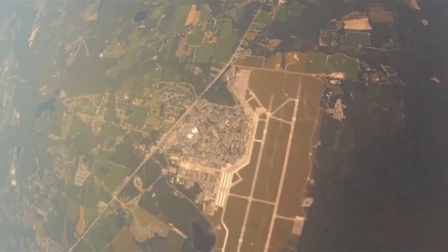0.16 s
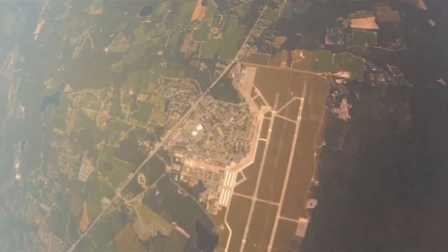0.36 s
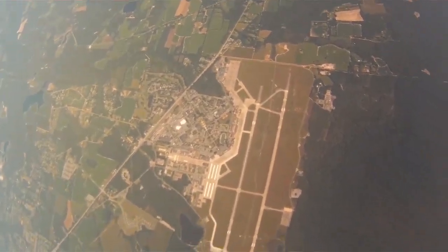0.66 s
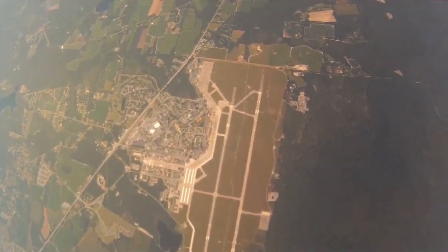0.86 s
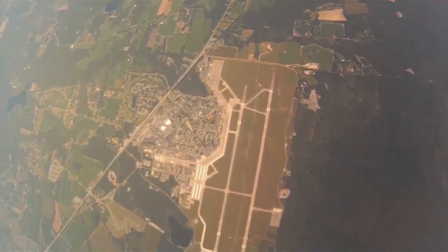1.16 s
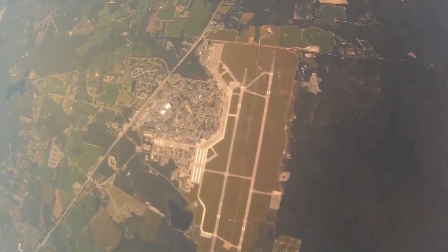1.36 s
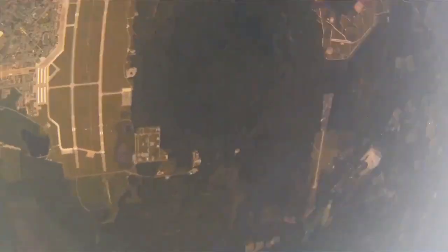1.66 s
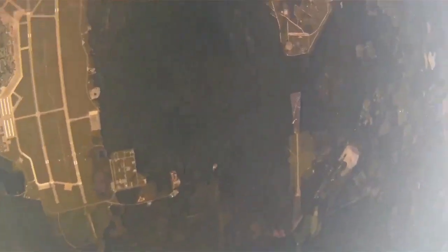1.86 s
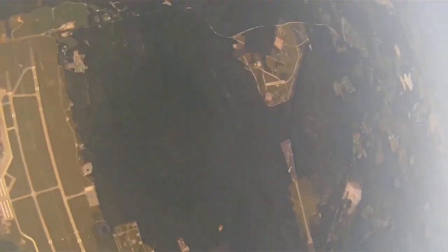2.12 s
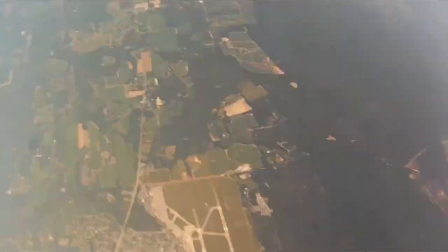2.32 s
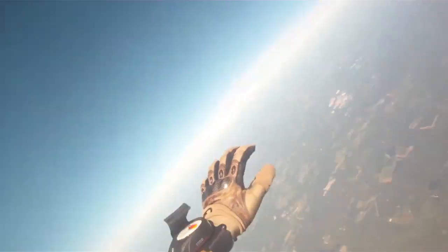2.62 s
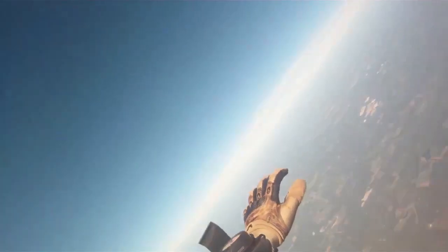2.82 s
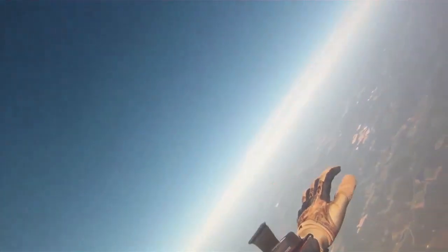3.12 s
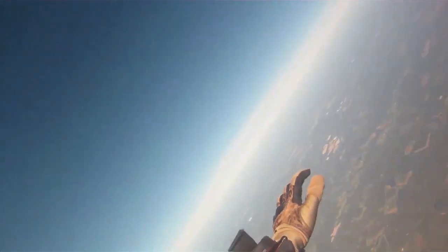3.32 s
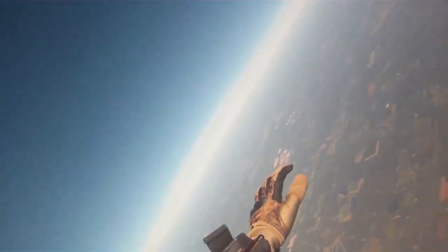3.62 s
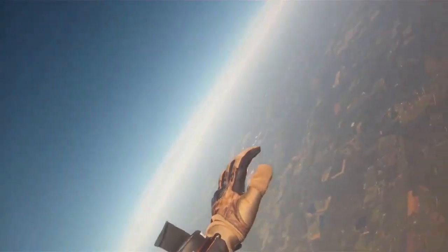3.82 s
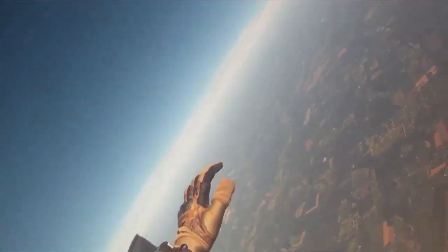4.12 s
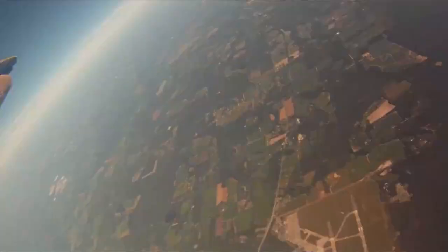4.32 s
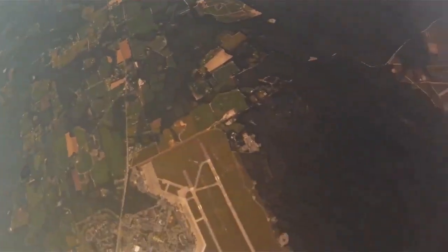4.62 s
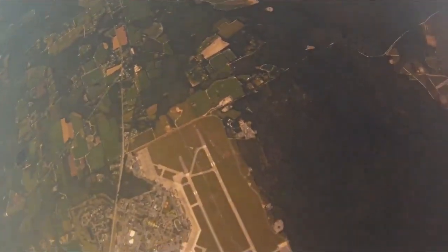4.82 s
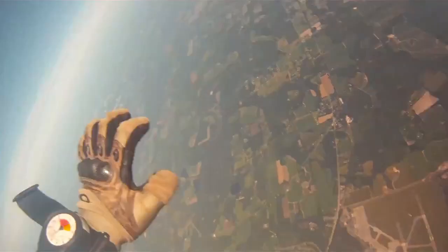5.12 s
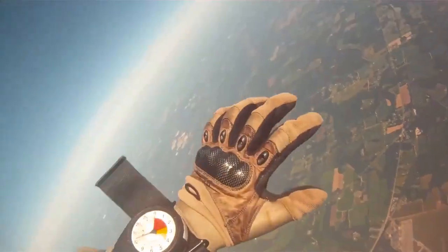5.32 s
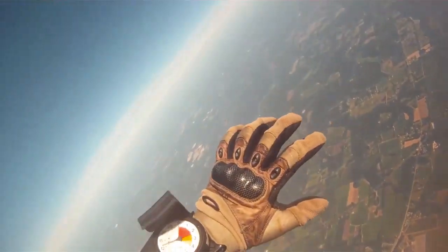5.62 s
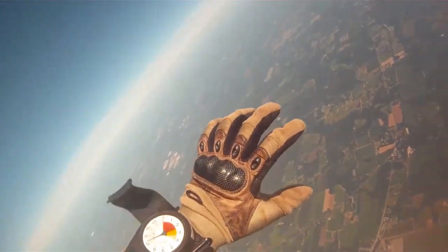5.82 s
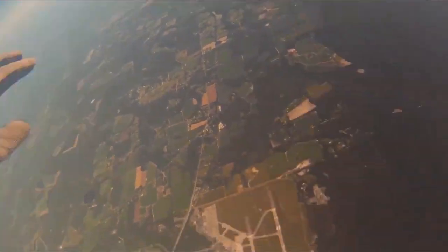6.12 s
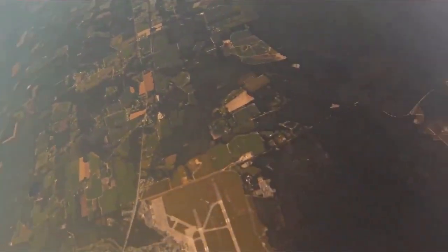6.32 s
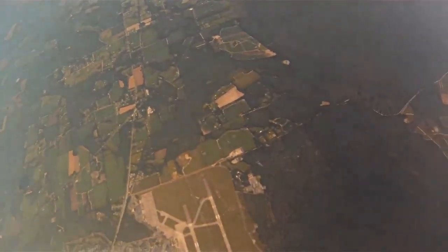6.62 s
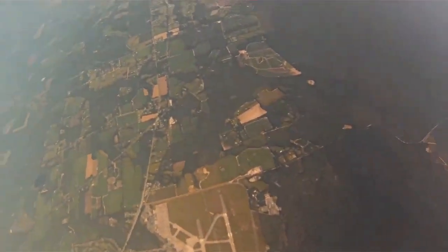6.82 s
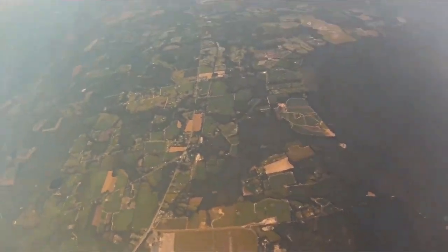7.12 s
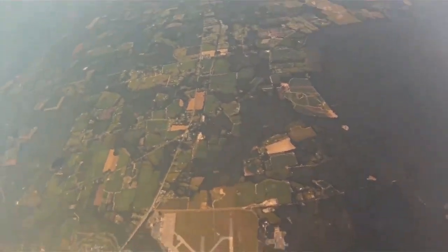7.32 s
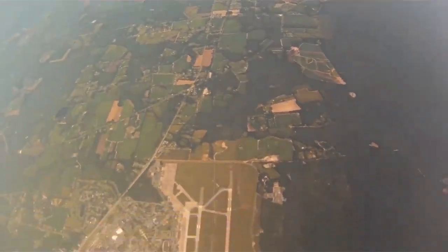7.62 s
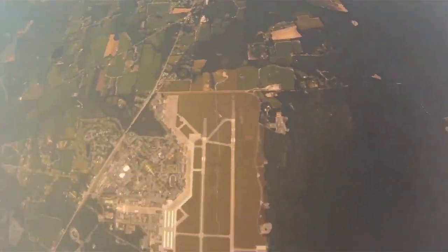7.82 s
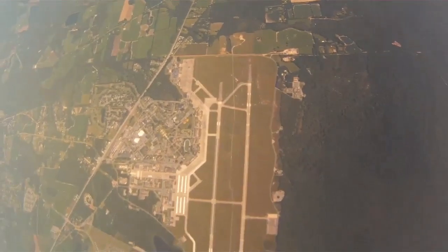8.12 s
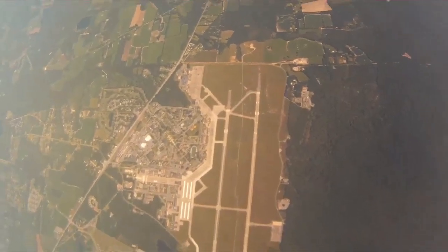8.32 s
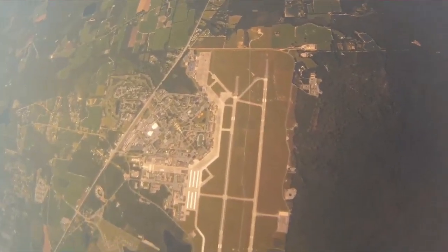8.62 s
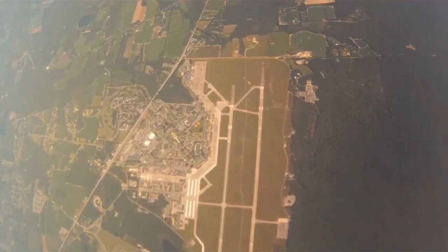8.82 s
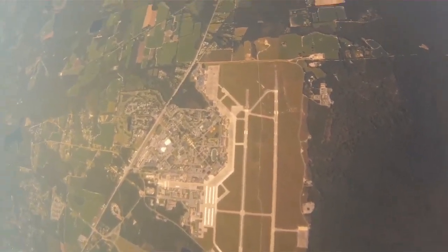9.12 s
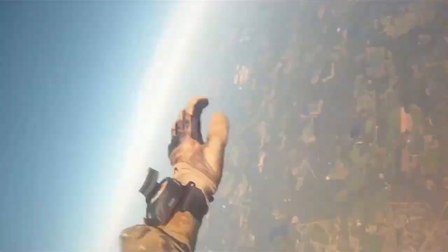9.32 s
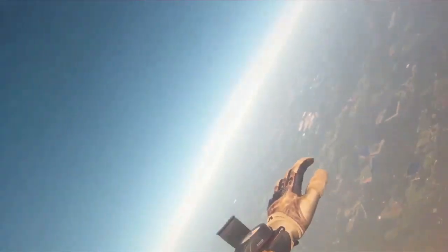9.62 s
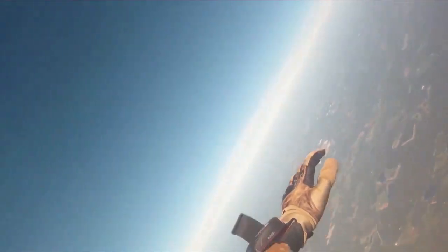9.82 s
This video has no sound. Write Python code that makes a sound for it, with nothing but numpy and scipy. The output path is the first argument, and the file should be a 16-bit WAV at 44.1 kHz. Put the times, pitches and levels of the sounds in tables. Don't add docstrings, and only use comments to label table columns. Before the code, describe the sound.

Dense, steady freefall wind fills all ten seconds, close and dry in mono, as if pressing on a small plastic camera case. From 0 to 2.3 s it is a bright, hissy, slightly hollow rush with light low flutter and a very faint whistle. Around 2.4 s it abruptly turns fuller and rougher: low buffeting swells, a blurred moan near 65 Hz appears and the midrange rings nasally around 730 Hz. At 4.4 s it snaps back to the thinner hiss, then at 5.2 s the heavy roar returns. From 6.2 s it is intermediate, with wavering low moan; at 7.1 s it deepens again. From 7.9 to 9.2 s the lean, airy rush returns, before a quick jump at 9.3 s to the heavy, fluttering roar, which continues to the cut. Small gusts roughen it throughout; the treble is gritty and limited.

```python
import sys
import numpy as np
from scipy import signal
from scipy.fft import rfft, irfft, next_fast_len
from scipy.io import wavfile
from scipy.ndimage import uniform_filter1d

SR = 44100
rng = np.random.default_rng(int(sys.argv[2]) if len(sys.argv) > 2 else 0)


def wav_out(sig):
    wavfile.write(sys.argv[1], SR, np.round(np.clip(np.atleast_2d(sig).T, -1, 1) * 32767).astype(np.int16))


def convert_level_to_amplitude(level_db):
    exponent = np.asarray(level_db, float) / 20
    return 10 ** exponent


N = 439236
SIZE, HOP = 2048, 256
HZ = np.fft.rfftfreq(SIZE, 1 / SR)
TIMES = np.arange(N // HOP + 9) * HOP / SR
SAMPLE_HZ = 12000

# (time [s], angle [0-1])
HEAD_ANGLE = [(0, 0.11), (1.6, 0.1), (1.75, 0.013), (2.28, 0), (2.45, 0.9), (4.3, 0.88), (4.42, 0.083),
              (5.05, 0.2), (5.2, 0.92), (6.1, 0.6), (6.2, 0.34), (6.95, 0.44), (7.1, 0.77), (7.8, 0.6),
              (7.92, 0.022), (9.2, 0.089), (9.35, 1), (9.96, 0.81)]
# (turn start [s], turn length [s], shedding pitch [Hz], wake over port [ratio], roll to
HELMET_POSES = [(0.0, .01, 131, 0.35, 0), (.72, 0.069, 127, 0.16, 0.96), (1.56, 0.062, 118, 0.66, -.3),
                (1.666, 0.047, 110, 0.77, 0.87), (2.246, 0.043, 107, 0.5, -.3), (2.4, 0.0386, 64, .75, 0.9),
                (2.617, 0.14, 64, 1.05, 0.7), (3.6, .2, 65, 0.93, 0.86), (4.294, 0.0567, 97, 0.5, 0.73),
                (4.446, 0.256, 112, 0.27, .9), (5.077, 0.0508, 61, 0.8, 0.57), (5.29, 0.21, 62, 0.61, 0.84),
                (5.955, .15, 67, 0.76, 1), (6.092, 0.041, 87.1, .25, 0.6), (6.604, 0.26, 97, 0.5, .8),
                (6.98, 0.051, 65, 0.98, 0.5), (7.197, 0.07, 66, 0.86, 0.8), (7.78, 0.0494, 100, 0.55, 1),
                (7.883, 0.153, 125, 0.32, 0.63), (9.047, .1, 122, 0.57, 0.3), (9.209, 0.043, 61, 0.65, 0.3),
                (9.363, 0.035, 61, 0.82, 0.94)]

# (start [s], end [s], pitch [Hz], bandwidth [Hz], level [dB])
GAP_WHISTLES = [(1.9, 2.1, 930, 27, -34), (2.5, 4.45, 729, 12.4, -34.5), (6, 6.2, 730, 21, -30.5),
                (10, 9.96, 793, 74, -29), (5.5, 7.8, 746, 11, -40), (5.5, 7.75, 506, 12, -48.5),
                (9, 9.96, 727, 14, -39.5), (7.5, 7.4, 2190, 35, -29), (0, 1.6, 1000, 35, -37.5),
                (7.5, 9.2, 1000, 27, -43), (2.5, 3.4, 930, 56, -36)]

# (at rest [dB], per across [dB], per wake [dB], per roll [dB])
MOAN_RESPONSE = [
    (-51, -6, -1.5, -0.5),
    (-63.5, 1.5, -2.5, 1),
]
# (time [s], length [s], strength [dB], lean to octave [dB])
SHEDDING_LOCKS = [(.95, 0.09, 3, -6), (1.12, .15, -6, -1), (1.45, 0.19, 4, -5.5), (1.68, 0.11, -4, 5),
                  (1.85, .22, 11, -1), (2.38, .2, -5, 0), (3.15, 0.22, 11, 2), (4.048, .12, 7, 4),
                  (4.23, 0.093, -8, 2), (4.41, .1, 7, 1), (5.14, 0.19, 0, 15), (5.5, .4, -2, 3),
                  (6.16, 0.12, 10, 11.5), (6.45, 0.44, 12, 11), (6.902, .12, 3, 9), (7.03, 0.055, -4, 0),
                  (7.12, .1, 3, 1), (2.72, 0.16, 6, -6), (3.77, 0.11, -2, -2), (3.95, 0.14, 2, -3),
                  (4.87, .15, 4, -3), (8.29, .08, 3, 0), (7.83, .08, 14, 4), (7.954, 0.11, -8, 8),
                  (8.07, .1, 5, -1), (8.377, 0.09, 10.5, 2), (8.715, .15, -1, -3), (9.16, 0.088, 7, 2),
                  (9.3, .06, 3, 0)]
MOAN_LEAN_SHARE = [-0.79, 1]

# (low edge [Hz], high edge [Hz])
WAKE_BANDS = [
    (25, 50),
    (140, 260),
    (270, 450),
]
# (frequency [Hz], density [dB per Hz])
WAKE_SPECTRUM = [(15, -71), (30, -46), (45, -39.5), (70, -22.5), (110, -8.5), (160, 0), (230, 3),
                 (310, 0.5), (400, -9.5), (480, -29), (900, -77), (3000, -120)]
# (at rest [dB], per across [dB], per wake [dB], per roll [dB])
WAKE_RESPONSE = [
    (-80, -2, -6, -2),
    (-53.5, 5, 7, 1.5),
    (-55.5, 6, 5.5, 1),
]
# (time [s], length [s], strength [dB], lean to flutter [dB])
VORTEX_SLAPS = [(.02, .15, 1, 1), (1.88, 0.2, 3.5, 0.5), (2.7, 0.076, 7.5, 2), (2.913, 0.18, 6.5, -2),
                (3.9, 0.41, 0, 4), (4.05, .1, 6.5, -6), (4.39, .1, 6, -3), (4.631, .1, 2, -2),
                (5.0, 0.13, 3, 0), (5.286, 0.077, 3.5, -5), (6.032, 0.38, 5.5, -4), (6.36, .12, 4, -4),
                (6.6, 0.54, 2.5, 1.5), (3.25, 0.23, 3, -2.5), (7.35, .25, -2.5, -0.5),
                (6.914, 0.12, 3.5, -4), (7.16, .08, -2, -3), (7.792, 0.3, 5, -2), (9.46, .08, 4, 5),
                (9.76, .06, 7.5, 6), (9.937, .08, 5, 1)]
WAKE_LEAN_SHARE = [-1.0, -1, 1]

# (low edge [Hz], high edge [Hz])
EDDY_BANDS = [
    (480, 1150),
    (1250, 1850),
    (1950, 2600),
    (2700, 5500),
]
# (frequency [Hz], density [dB per Hz])
CASE_SPECTRUM = [(40, -88), (300, -37), (400, -21), (600, -18), (800, -9), (1200, -12.5), (1900, -14.5),
                 (2300, -9.5), (3000, -11.5), (3600, -13), (4300, -24), (5000, -28), (5600, -39.5),
                 (5850, -46), (6000, -47)]
# (frequency [Hz], bandwidth [Hz], head into stream [dB], head across [dB])
PANEL_MODES = [(400, 90, -7.5, 1), (541, 92, 0, 6), (577, 40, 3, -4.5), (722.7, 24, 8, 13.5),
               (743, 37, 0.5, -4), (930, 99, -5, 8.5), (984, 140, 10.5, 1.5), (1192, 130, -1, 3),
               (1190, 60, 0, 2), (1433, 120, 5, 2), (1627, 130, 3, 1.5), (2127, 112, 5, 5),
               (2502, 80, 2, 3.5), (2820, 145, 5, -3.5), (3550, 280, 0.5, 2.5), (3720, 123, -9, 2),
               (4100, 320, 4.5, 6.5), (5370, 510, 4.5, 2.5)]
# (at rest [dB], per across [dB], per wake [dB], per roll [dB])
EDDY_RESPONSE = [
    (-33.5, 2, 10.5, 0),
    (-29.5, 0, 1, 4),
    (-19, 0.5, -1.5, -.5),
    (-26.5, -9, 2.5, 1),
]
# (time [s], length [s], strength [dB], lean to large eddies [dB])
STREAM_GUSTS = [(0.106, 0.056, 2, -0.5), (0.148, 0.054, -3.5, -2), (1.65, 0.09, -1, 0.5),
                (1.718, .04, 1, 1), (1.88, 0.068, 2, 2.5), (1.902, 0.033, -0.5, 2.5),
                (2.273, 0.037, -0.5, -4.5), (2.35, .16, -1.5, -0.5), (3.055, .04, -1, 5),
                (3.134, 0.031, -3, 7), (3.69, 0.049, -2, -0.5), (3.775, 0.042, 1, -0.5),
                (3.812, .08, -2, -0.5), (4.19, 0.046, 1.5, 4), (4.378, 0.037, 1, 5.5), (5.154, .1, -2, 0),
                (5.243, 0.044, 2, -1), (5.297, .05, -3.5, -3), (7.04, .08, 1, 1),
                (7.118, 0.059, -0.5, -4.5), (7.174, 0.077, -4, 0.5), (7.37, 0.043, 1.5, 0.5),
                (7.57, .05, 1, 1), (8.27, 0.059, -0.5, 1), (9.165, 0.069, -5, -4.5), (9.346, 0.042, -2, -1),
                (9.463, 0.038, -2.5, 3), (9.49, .04, 3.5, 3), (9.77, .04, 2, 1.5), (9.927, 0.028, 1, 3)]
EDDY_LEAN_SHARE = [0.92, -0.45, -0.66, -0.54]

# (frequency [Hz], level [dB])
IMAGE_REMAINDER = [(6000, -1), (6760, -7), (7800, -16), (8830, -25), (9860, -32), (10900, -44),
                   (11300, -49), (11620, -46), (12000, -70), (12400, -48), (12750, -52), (13500, -48),
                   (14000, -44.5), (16000, -45)]


def evened(x):
    return x / np.sqrt(np.mean(x ** 2) + 1e-20)


def read(points, hz):
    f, value = np.transpose(points)
    return np.interp(np.log(hz + 1), np.log(f + 1), value)


def drift(t, slow_hz, fast_hz, count=40):
    rates = np.geomspace(slow_hz, fast_hz, count)
    sines = np.sin(2 * np.pi * (np.outer(t, rates) + rng.random(count)))
    return evened(sines @ rates ** -.3)


def head_across(t):
    return np.clip(np.interp(t, *np.transpose(HEAD_ANGLE)), 0, 1)


def pose(t):
    start, lasts, *states = np.transpose(HELMET_POSES)
    knots = np.transpose([start, start + abs(lasts)]).ravel()
    knots = np.maximum.accumulate(knots)
    before_and_after = np.r_[0, :2 * len(start) - 1]
    return [np.interp(t, knots, np.repeat(state, 2)[before_and_after]) for state in states]


def levels_db(t, response, events, lean_share):
    s, length, db, lean_db = np.transpose(events)
    bumps = np.exp(-np.pi * ((t[:, None] - s) / length) ** 2)
    steady_db = np.array(response) @ [np.ones(len(t)), head_across(t), *pose(t)[1:]]
    return steady_db + bumps @ db + np.outer(lean_share, bumps @ lean_db)


def turbulence(levels, bands, colour_db, patchy_db):
    share_db = []
    for lo, hi in bands:
        inside = (HZ >= lo) & (HZ < hi)
        share_db.append(10 * np.log10(np.sum(convert_level_to_amplitude(2 * colour_db[inside]), axis=0)))
    lift_db = np.array([db - share for db, share in zip(levels, share_db)])
    centres = np.log([lo * hi for lo, hi in bands]) / 2
    blend = np.array([np.interp(np.log(HZ + 1), centres, one) for one in np.eye(len(bands))])
    real, imag, patches = rng.standard_normal((len(TIMES), len(HZ), 3)).T
    patches = uniform_filter1d(patches, size=20, axis=0)
    patches = evened(uniform_filter1d(patches, size=7, axis=1))
    z = (real + 1j * imag) * convert_level_to_amplitude(colour_db + blend.T @ lift_db + patchy_db * patches)
    noise = signal.istft(z, nperseg=SIZE, noverlap=SIZE - HOP)[1][:N]
    return noise * np.sqrt(SIZE / HOP) / 2.31


def whistles(fade_s=0.036):
    t = np.arange(N) / SR
    noise, out = rng.standard_normal(N), np.zeros(N)
    for start, end, hz, width, db in GAP_WHISTLES:
        r = np.exp(-2 * np.pi * width / SR)
        poles = [1, -2 * r * np.cos(2 * np.pi * hz / SR), r * r]
        ring = signal.sosfilt([[1, 0, -1, *poles]] * 3, noise)
        fade = np.clip(np.minimum(t - start, end - t) / fade_s + .5, 0, 1)
        out += convert_level_to_amplitude(db) * evened(ring) * fade
    return out


def moan(steady=0.45, cycles=5.):
    levels = levels_db(TIMES, MOAN_RESPONSE, SHEDDING_LOCKS, MOAN_LEAN_SHARE)
    levels = levels + [2.3 * drift(TIMES, 8, 25) for _ in levels]
    t = np.arange(N) / SR
    turns = np.cumsum(pose(t)[0]) / SR
    noise = rng.standard_normal((2, 4000, 2)) @ [1, 1j]
    fuzz = signal.lfilter(np.hanning(9), 1, noise) / np.sqrt(6)
    out = np.zeros(N)
    for k, db in enumerate(levels):
        wander = np.interp(turns * 4 / cycles, np.arange(4000), fuzz[k])
        wander /= np.sqrt(abs(wander) + .1)
        carrier = np.exp(2j * np.pi * (k + 1) * turns)
        tone = evened(((steady + wander) * carrier).real)
        out += convert_level_to_amplitude(np.interp(t, TIMES, db)) * tone
    return out


def buffet():
    lumps_db = np.interp(np.arange(N) / SR, TIMES, 0.79 * drift(TIMES, 5.2, 30))
    levels = levels_db(TIMES, WAKE_RESPONSE, VORTEX_SLAPS, WAKE_LEAN_SHARE)
    colour_db = read(WAKE_SPECTRUM, HZ)[:, None]
    return turbulence(levels, WAKE_BANDS, colour_db, patchy_db=1.5) * convert_level_to_amplitude(lumps_db)


def rush():
    across = head_across(TIMES)
    hz, width, into_db, across_db = np.transpose(PANEL_MODES)
    rings = 1 / (1 + (2 * (HZ[:, None] - hz) / width) ** 2)
    rings_db = np.outer(rings @ into_db, 1 - across) + np.outer(rings @ across_db, across)
    case_db = read(CASE_SPECTRUM, HZ)
    case_db = case_db - 80 * (HZ > SAMPLE_HZ / 2)
    fine = np.arange(0, N, 32) / SR
    gusts_db = np.interp(np.arange(N) / SR, fine, 1.0 * drift(fine, 24, 300, count=80))
    levels = levels_db(TIMES, EDDY_RESPONSE, STREAM_GUSTS, EDDY_LEAN_SHARE)
    roar = turbulence(levels, EDDY_BANDS, case_db[:, None] + rings_db, patchy_db=0.82)
    return roar * convert_level_to_amplitude(gusts_db)


def scene():
    return (whistles() + moan() + buffet() + rush())[None]


def mirror_images(x):
    mirrored = 2 * x * np.cos(2 * np.pi * SAMPLE_HZ * np.arange(N) / SR)
    size = next_fast_len(N)
    hz = np.fft.rfftfreq(size, 1 / SR)
    left = convert_level_to_amplitude(np.interp(hz, *np.transpose(IMAGE_REMAINDER))) * (hz > SAMPLE_HZ / 2)
    return irfft(rfft(mirrored, size) * left, size)[:, :N]


def quiet_dropped(x, floor_db=-102.0, above_hz=4000.):
    hz, _, z = signal.stft(x, SR, nperseg=1024, noverlap=768)
    power = uniform_filter1d(abs(z) ** 2, size=4, axis=1)
    power = uniform_filter1d(power, size=4, axis=2)
    kept = (power > convert_level_to_amplitude(2 * floor_db)) | (hz < above_hz)[:, None]
    return signal.istft(z * kept, SR, nperseg=1024, noverlap=768)[1][:, :N]


def top_cut(x):
    return signal.sosfilt(signal.butter(12, 15290, fs=SR, output="sos"), x)


def record(dry):
    dry = dry * signal.windows.tukey(N, .0002)
    mix = quiet_dropped(dry + mirror_images(dry))
    return top_cut(mix)


dry = scene()
out = record(dry)
wav_out(out)
```